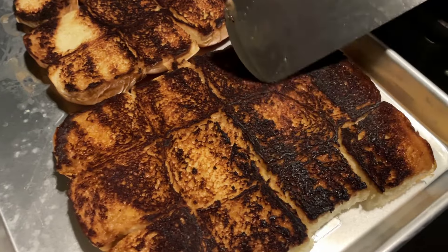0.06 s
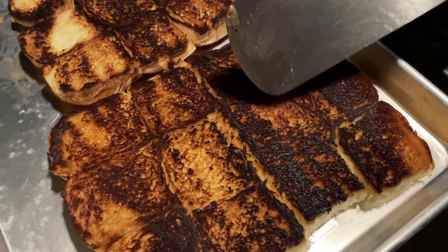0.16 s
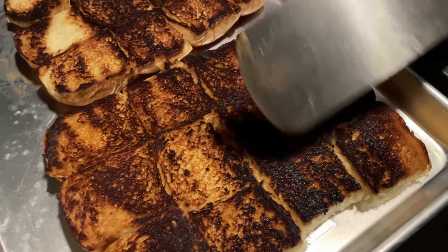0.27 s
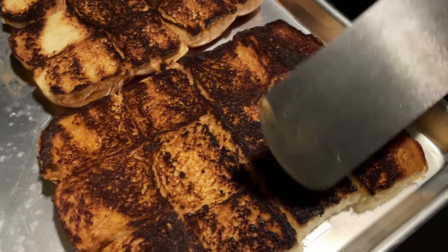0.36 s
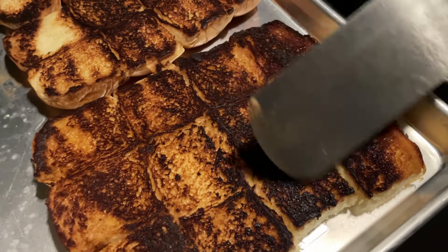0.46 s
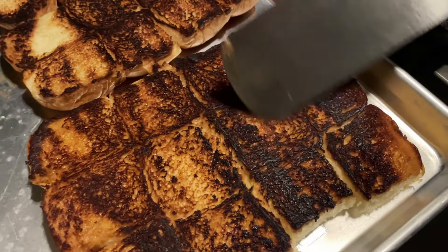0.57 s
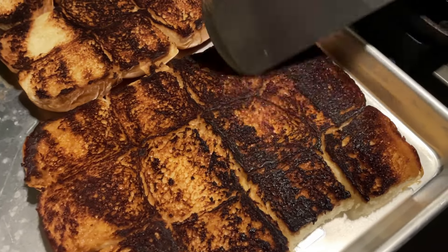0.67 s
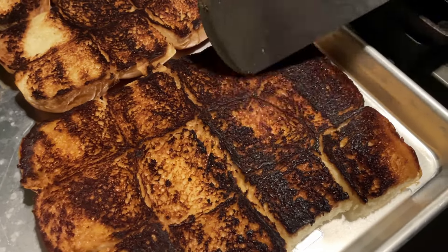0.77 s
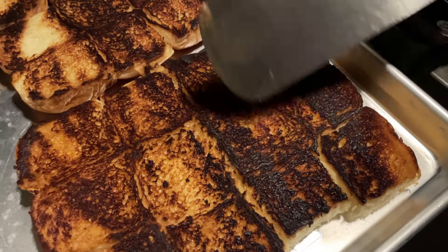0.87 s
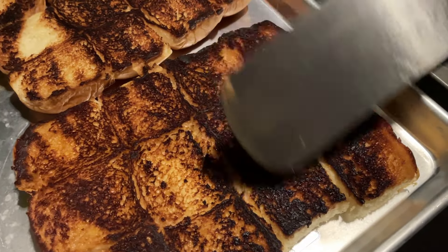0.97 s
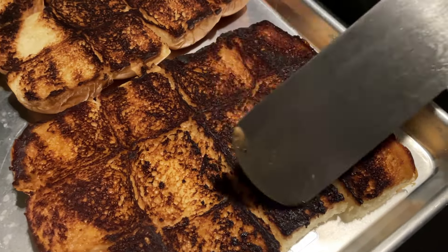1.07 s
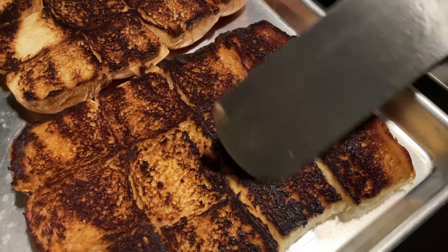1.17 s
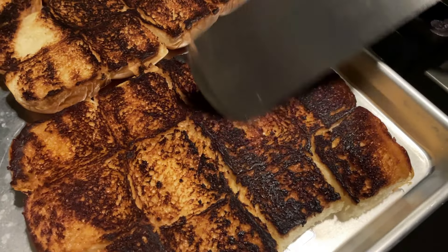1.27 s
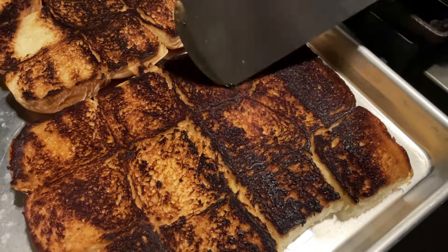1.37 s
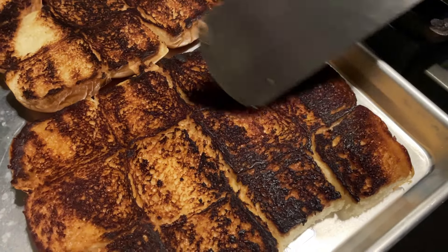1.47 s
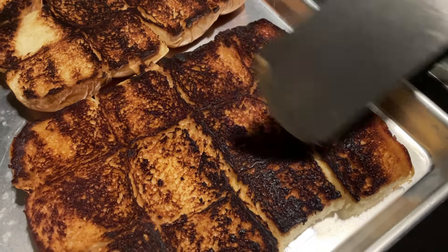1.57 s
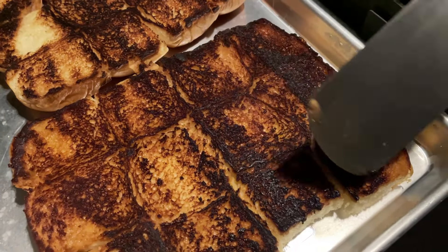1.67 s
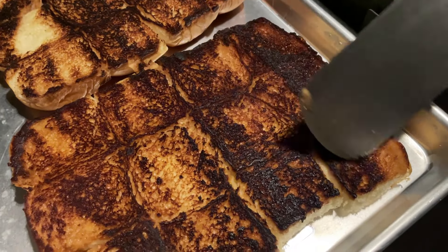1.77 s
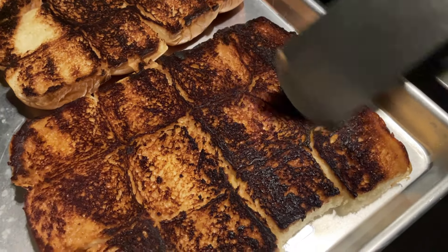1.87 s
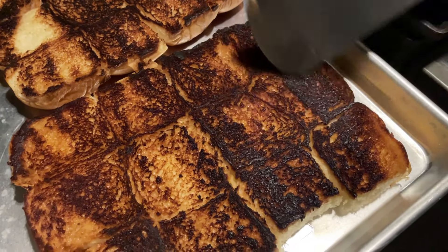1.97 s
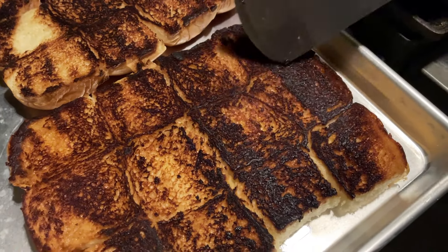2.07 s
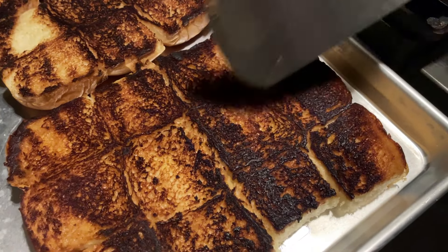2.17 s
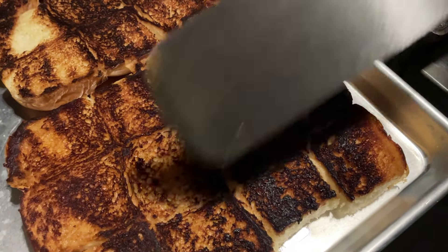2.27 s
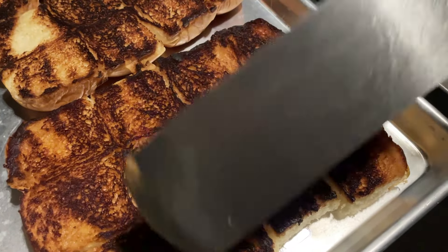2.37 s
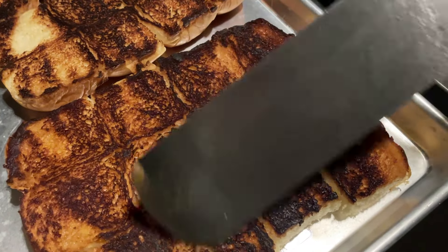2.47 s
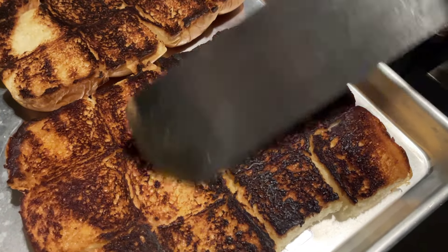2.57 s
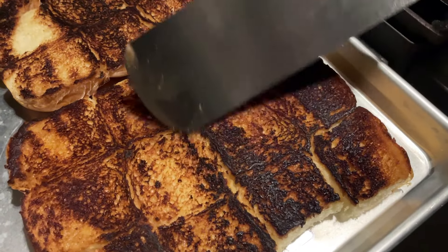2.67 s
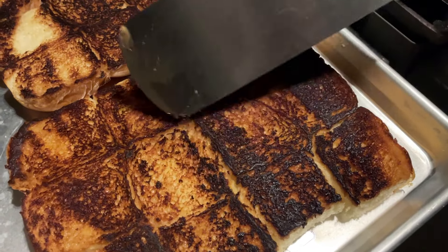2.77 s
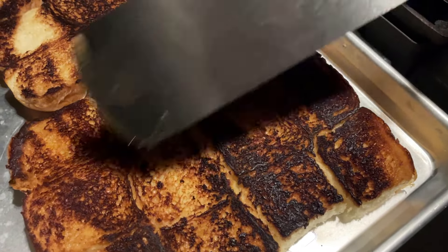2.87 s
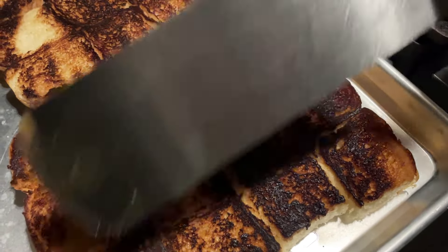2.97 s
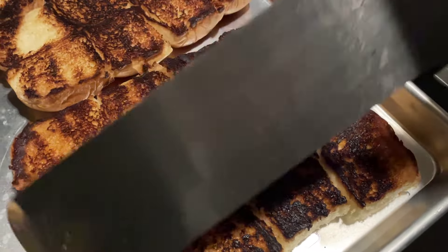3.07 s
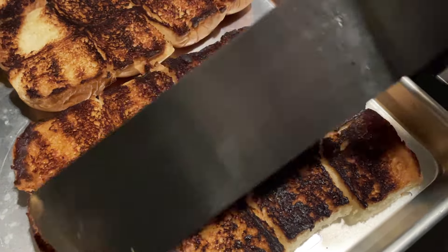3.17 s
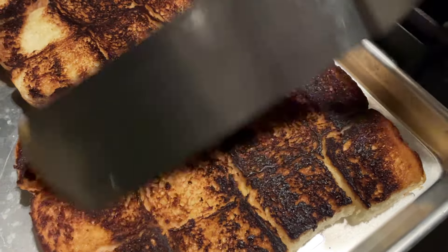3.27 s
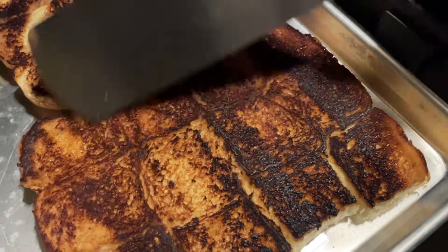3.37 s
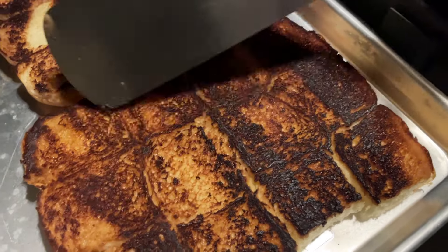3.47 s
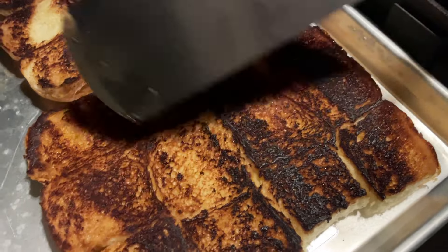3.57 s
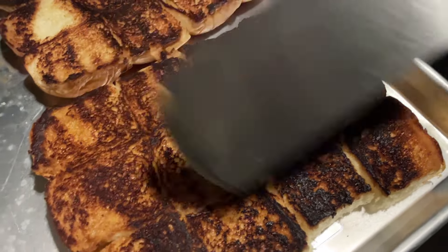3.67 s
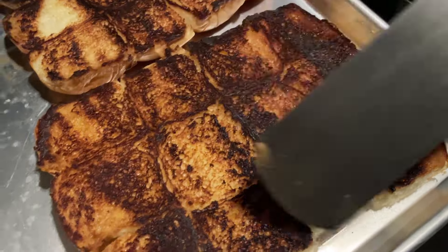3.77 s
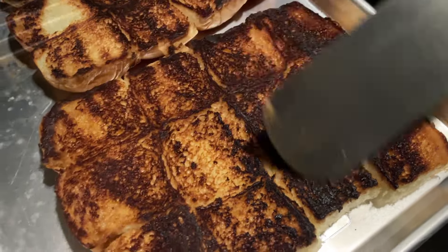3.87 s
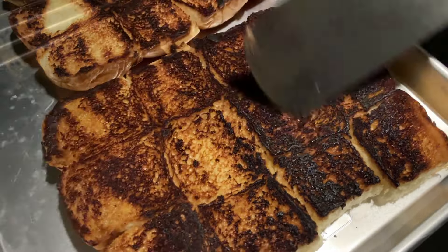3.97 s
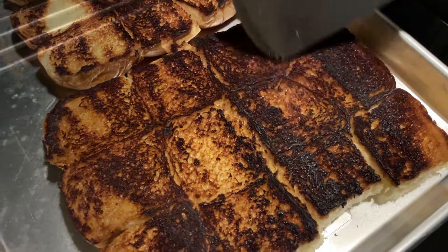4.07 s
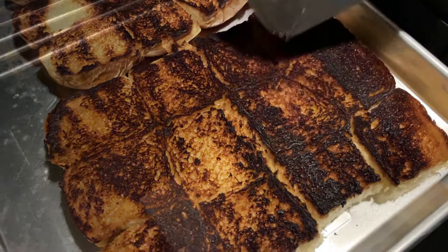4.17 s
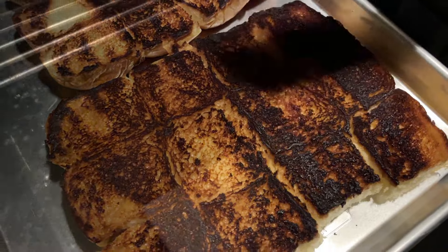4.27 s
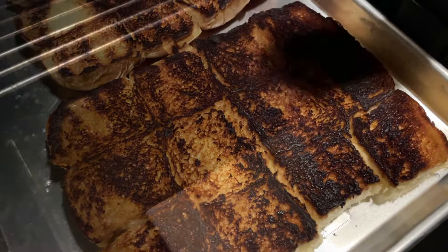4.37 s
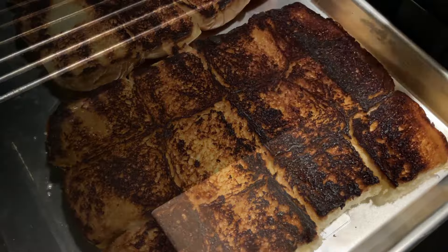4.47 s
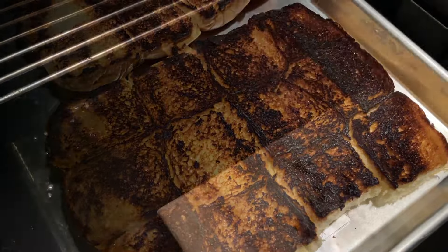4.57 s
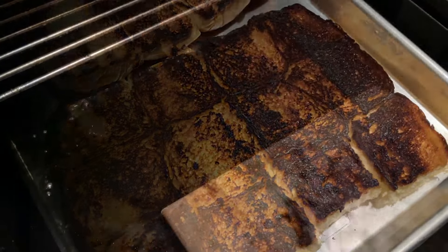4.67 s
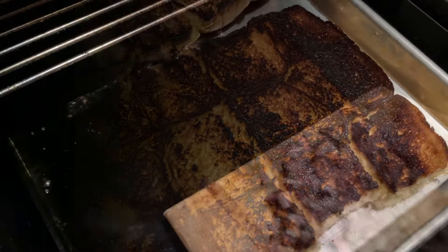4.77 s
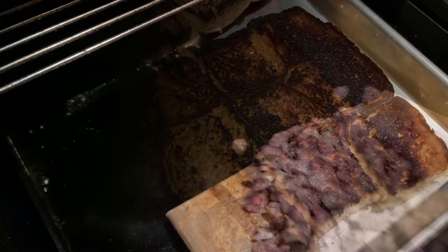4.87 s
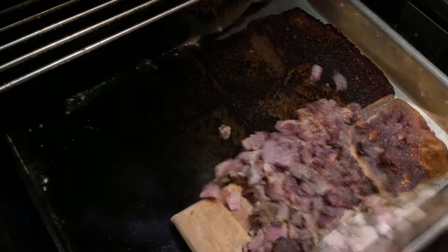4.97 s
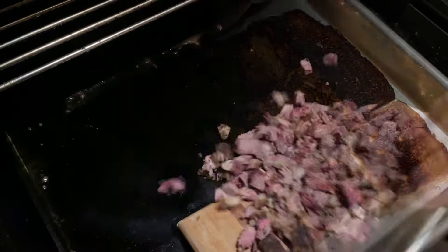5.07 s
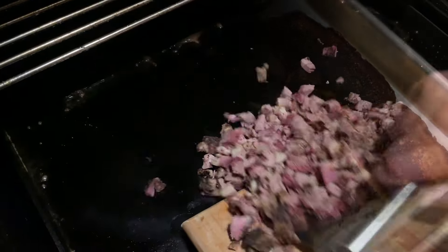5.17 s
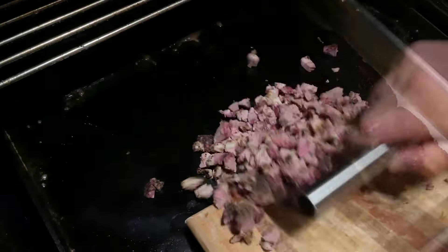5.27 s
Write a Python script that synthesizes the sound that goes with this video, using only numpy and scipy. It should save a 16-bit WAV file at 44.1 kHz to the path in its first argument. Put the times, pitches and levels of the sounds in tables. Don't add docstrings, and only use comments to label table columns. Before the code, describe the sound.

Crisp scrapes of a metal blade across burnt crust, one after another, then a brief gritty push on a wooden board.

```python
import sys
import numpy as np
from scipy import signal
from scipy.fft import rfft, irfft
from scipy.io import wavfile

SR = 44100
rng = np.random.default_rng(int(sys.argv[2]) if len(sys.argv) > 2 else 0)


def gain_from_db(level_db):
    decades = np.asarray(level_db, float) / 20
    return 10 ** decades


def digitize_waveform(pressure):
    field = np.atleast_2d(pressure).T
    bounded = np.clip(field, -1, 1)
    quanta = np.round(bounded * 32767).astype(np.int16)
    wavfile.write(sys.argv[1], SR, quanta)


N = 234021
T = np.arange(N) / SR

# (frequency [Hz], density [dB per Hz])
HISS = [(600, -27), (1500, -19.5), (4500, -14.5), (7000, -13.5), (9500, -6), (12000, -12.5), (13500, -4.5),
        (15500, -16), (16000, -41)]


def evened(x):
    return x / np.sqrt(np.mean(x ** 2) + 1e-20)


def read(points, hz):
    f, value = np.transpose(points)
    return np.interp(np.log(hz + 1), np.log(f + 1), value)


def coloured(x, points):
    hz = np.fft.rfftfreq(1023, 1 / SR)
    slope_db = read(points, hz) - 40 * (hz < points[0][0] / 2)
    taps = np.fft.fftshift(np.fft.irfft(gain_from_db(slope_db), 1023)) * np.hanning(1023)
    return signal.oaconvolve(x, taps[None] / np.linalg.norm(taps), "same", axes=1)


def gain_curve(rows, column):
    rows = np.array(rows)
    return np.interp(T, rows[:, 0], rows[:, column], -200, -200)


def grains(per_s, spread_db):
    size_db = spread_db * np.minimum(rng.exponential(1, (2, N)), 3.5)
    size = gain_from_db(size_db) * rng.standard_normal((2, N))
    return evened(size * (rng.random((2, N)) < per_s / SR))


def wander(per_s):
    knots = rng.standard_normal(400)
    return np.interp(T * per_s, np.arange(400), knots)


def ring(drive, hz, width):
    r = np.exp(-np.pi * width / SR)
    return 2 * signal.lfilter([1 - r], [1, -r * np.exp(2j * np.pi * hz / SR)], drive)


def clicks(events):
    train = np.zeros(N)
    for s, db, *_ in events:
        train[round(s * SR)] = gain_from_db(db)
    return train


def duct_flap():
    # (time [s], peak [dB], pitch [Hz])
    flaps = [(0.108, -36, 223), (0.394, -39.5, 201.4), (0.57, -35.5, 174), (0.679, -41.5, 219),
             (0.767, -36.5, 207.7), (0.84, -36.5, 201), (1.03, -41.5, 177.3), (1.122, -35.5, 197),
             (1.226, -42.5, 229), (1.378, -39, 169.5), (1.5, -44, 143.7), (1.659, -35, 205),
             (1.777, -38, 175.5), (1.99, -39, 141.7), (2.137, -38.5, 204), (2.183, -34, 196),
             (2.585, -37, 219), (2.721, -36, 203), (2.758, -40.5, 209), (2.881, -37, 182.5),
             (3.063, -36, 180), (3.246, -37.5, 190), (3.352, -40, 250), (3.483, -39.5, 162),
             (3.584, -39.5, 211.6), (3.696, -41.5, 202), (3.799, -37.5, 235.6), (4.39, -44.5, 159),
             (4.583, -48, 231.5), (4.934, -41.5, 218.5)]
    thuds = np.zeros(N + 2000)
    t = np.arange(2000) / SR
    for s, db, hz in flaps:
        bell = np.exp(-((t - 0.010) * hz / 0.84) ** 2)
        tone = np.cos(2 * np.pi * (hz * t + rng.random()))
        thuds[round(s * SR):][:2000] += gain_from_db(db + 2) * bell * tone
    return thuds[:N]


def extractor():
    # (frequency [Hz], density [dB per Hz])
    air_spectrum = [(25, -54.5), (45, 3.5), (100, 2.5), (220, -2), (330, -12.5), (600, -19), (1200, -26.5),
                    (2500, -36), (5000, -43.5), (9000, -45), (13850, -50.5), (14150, -36), (14500, -44.5),
                    (16000, -63)]
    rumble_db, fade_s, fade_db_s, faded_db = -47, 3.97, 6.5, -54
    hz = np.fft.rfftfreq(N, 1 / SR)
    noise = rfft(rng.standard_normal((2, N)), axis=1)
    air = evened(irfft(noise * gain_from_db(read(air_spectrum, hz)), N, axis=1))
    lumps = signal.sosfiltfilt(signal.butter(2, 300, fs=SR, output="sos"), air)
    air = air + (gain_from_db(2.0 * wander(14)) - 1) * lumps
    pitches = np.geomspace(420, 1300, 9) * rng.uniform(0.94, 1.05, 9)
    clatter = sum(ring(grains(30, 1.5), pitch, 18).real for pitch in pitches)
    level_db = np.maximum(rumble_db - fade_db_s * np.maximum(T - fade_s, 0), faded_db)
    return gain_from_db(level_db) * (air + gain_from_db(-20.5) * evened(clatter))


def oven():
    # (time [s], pitch [Hz], level [dB])
    hum = [
        (3.4, 47.6, -62),
        (3.75, 48.16, -54.5),
        (3.83, 47.6, -48.5),
        (4.052, 46.65, -41),
        (4.414, 49.7, -41),
        (4.588, 48.3, -48),
        (4.912, 52.75, -48),
        (5.08, 53.9, -62),
        (5.307, 54.5, -58),
    ]
    s, hz, _ = np.transpose(hum)
    turn = 2 * np.pi * np.cumsum(np.interp(T, s, hz)) / SR
    return gain_from_db(gain_curve(hum, 2) + 5.5) * (np.sin(turn) + 0.019 * np.sin(2 * turn))


def scraper():
    # (time [s], level [dB])
    push = [
        (4.6, -100),
        (4.746, -85.5),
        (4.858, -77),
        (4.902, -84),
        (4.93, -74),
        (5.022, -65),
        (5.138, -52),
        (5.25, -49),
        (5.307, -49.5),
    ]
    # (frequency [Hz], width [Hz], level [dB])
    board_modes = [(705, 51, -1), (1470, 39, 13.5), (1800, 100, -2), (2120, 190, 3), (2380, 80, 7),
                   (2620, 60, 7.5), (3230, 96, 6.5), (3920, 27, -22)]
    board_db, top_db, sag, lift_s = 7.5, -56.5, 0.55, 5.27
    rub = grains(17000, 3.1)
    speed_db = gain_curve(push, 1)
    drive_db = speed_db + board_db
    press_db = np.minimum(drive_db, top_db - sag * (drive_db - top_db))
    press_db = press_db - 20 * (T > lift_s)
    board = np.zeros((2, N))
    for hz, width, db in board_modes:
        board += gain_from_db(db) * ring(rub * gain_from_db(press_db + 2.0 * wander(25)), hz, width).real
    return gain_from_db(3.5) * coloured(rub, HISS) * gain_from_db(speed_db) + gain_from_db(14.5) * board


def far_whines():
    # (time [s], length [s], frequency [Hz], level [dB])
    whine_rows = [
        (0.286, .2, 1790, -72),
        (0.765, 0.18, 416, -65),
        (0.83, 0.11, 881, -62.5),
        (2.142, 0.18, 538, -66),
        (4.695, 0.22, 1013, -68),
        (4.913, 0.12, 705, -61.5),
    ]
    out = np.zeros((2, N))
    for s, length, hz, db in whine_rows:
        bell = np.exp(-((T - s - length / 2) / length * 2) ** 4)
        out += gain_from_db(db) * bell * evened(ring(rng.standard_normal((2, N)), hz, 28).real)
    return out


def hand_taps():
    # (time [s], peak [dB], frequency [Hz], width [Hz])
    tap_rows = [
        (1.049, -56, 575, 250),
        (1.086, -45, 1000, 251),
        (1.655, -52, 1000, 250),
        (2.179, -65, 537, 250),
        (3.8, -52, 610, 250),
        (4.388, -61, 950, 250),
        (4.779, -60.5, 1350, 250),
        (4.934, -59, 1470, 250),
    ]
    out = np.zeros(N)
    for row in tap_rows:
        hz, width = row[2:]
        once = ring(clicks([row]), hz, width).real
        out += ring(once, hz, width).real * SR / width
    return gain_from_db(-8.5) * out


def crumbs_and_brush():
    # (time [s], peak [dB])
    tick_rows = [
        (0.2653, -40),
        (2.9238, -44.5),
        (4.557, -54.5),
        (4.9214, -49),
        (5.001, -63),
    ]
    brush_s, brush_db, rise_s, fall_db_s = 0.2705, -57, 0.018, 215.5
    fizz = rng.standard_normal((2, 400)) * gain_from_db(-60 * np.arange(400) / SR / 0.0086)
    ticks = signal.oaconvolve(clicks(tick_rows)[None], fizz, axes=1)[:, :N]
    brush = gain_from_db(brush_db - fall_db_s * abs(T - brush_s))
    brush *= np.clip(1 + (T - brush_s) / rise_s, 0, 1)
    return coloured(gain_from_db(-8.0) * ticks + gain_from_db(6) * grains(12000, 0.67) * brush, HISS)


def tray(x):
    out = 0.2 * x
    t = np.arange(5000)[:, None] / SR
    for k in range(3):
        pitch = rng.uniform(1100, 16000, 110)
        phase = 2 * np.pi * rng.random((2, 1, 110))
        body = (np.cos(2 * np.pi * pitch * t + phase) * gain_from_db(-60 * t / 0.08)).sum(2)
        share = np.sqrt(2 / 3) * np.cos(12 * T + k * np.pi / 3)
        out = out + 0.7 * signal.oaconvolve(x * share, body / np.linalg.norm(body[0]), axes=1)[:, :N]
    return out


def crust_crackle(snaps, push, landing):
    # (frequency [Hz], density [dB per Hz])
    crust = [(1100, -25), (1450, 2.5), (1900, -11), (2350, -6), (2750, -11), (3800, -3.5), (4700, -12),
             (5150, -6), (5600, -27), (7700, -2.5), (10800, -12), (13200, -9), (14600, -15), (15700, -32.5)]
    return coloured(tray(snaps * push + landing), crust)


def crumb_crunch(push, since):
    # (frequency [Hz], density [dB per Hz])
    crunch = [(250, -6.5), (450, -12), (800, -1), (1200, -9.5), (1600, -20.5)]
    dig_s, dig_db = 0.062, -10
    push = push * gain_from_db(dig_db * np.exp(-np.maximum(since, 0) / dig_s))
    return gain_from_db(4) * coloured(grains(2500, 2.66) * push * gain_from_db(4.9 * wander(25)), crunch)


def blade_favour(stroke, since, over_firm_db):
    # (2nd, 4th, 5th, 6th and 11th mode [dB])
    grip = [(8, -25.5, -1, -10, 8), (3.5, -2.5, 0.5, -3, 6), (1.5, 2, 2, -6, -0.5),
            (-0.8, -0.5, 1.7, -0.1, 4), (1.5, 1, 1, -4.5, 2.2), (-1.2, -30.5, -5.5, -4, 2.5),
            (4.5, -7.5, -1.5, 0, 6.5)]
    slide_rate = [1, 22, 35.5, 1, -39, 11.5, 64]
    favour_db = dict(zip((1, 3, 4, 5, 10), np.array(grip)[stroke].T))
    slide_db = np.array(slide_rate)[stroke] * (since - 0.13)
    favour_db[3] = favour_db[3] - slide_db
    favour_db[5] = favour_db[5] + slide_db
    favour_db[0] = 0.3 * np.minimum(over_firm_db, 0)
    return favour_db


def blade_ring(snaps, low, middle, top, landing, favour_db):
    mode_hz = [1402, 1620, 2284, 3695, 3935, 4405, 5110, 5640, 5952, 6386, 6948, 7422, 7746, 8125, 8539,
               9050, 9480, 9645, 10700, 11703, 11901, 12160, 12742, 12972, 13340, 13726, 14100, 14700,
               15100]
    # (width [Hz], level [dB])
    mode_shape = [(13.9, 10.5), (11.1, 11.5), (60.4, -8.5), (9.62, 4.5), (14.3, 3.5), (7.5, 4.5), (35, -23),
                  (25.2, -9.5), (20.2, 0), (20, -5.5), (16.8, -3.5), (17, -1.5), (21.8, 4), (20.3, -6),
                  (17, 10.5), (50, 0), (14, -21.5), (20, -0.5), (22, -6.5), (18, -14.5), (25.2, 1),
                  (20, -7.5), (17.94, -4), (22, 2), (50, -11), (24, -17), (29.8, -6.5), (30, -12),
                  (30, -10.5)]
    opening = clicks([(0.0022, -12)])
    long_ring = gain_from_db(9) * ring(snaps[1] * low, 1319, 2.4)
    blade = np.array([long_ring.real, long_ring.imag])
    for k, (hz, (width, db)) in enumerate(zip(mode_hz, mode_shape)):
        if hz < 2000:
            push, group_db = low, 13
        elif hz < 9000:
            push, group_db = middle, 17
        else:
            push, group_db = top, 17
        favour = favour_db.get(k, 0)
        shape_db = favour + (1.8 if k in favour_db else 4.5) * wander(16)
        stored = opening * gain_from_db(favour - 3 * (hz > 2000))
        drive = snaps[0] * push * gain_from_db(shape_db) + landing + stored
        tone = gain_from_db(db + group_db) * ring(drive, hz, width)
        blade += [tone.real, rng.choice([-1, 1]) * tone.imag]
    return blade


def spatula():
    # (time [s], pressure [dB])
    strokes = [
        [(0.0, -30.5), (0.012, -34.5), (0.056, -49.5), (0.095, -60), (0.112, -53.5), (0.126, -57), (0.17, -72)],
        [(0.538, -69), (0.548, -34.5), (0.572, -29.5), (0.6, -31), (0.635, -29), (0.642, -41), (0.7, -53.5),
         (0.79, -79)],
        [(1.135, -72.5), (1.157, -44.5), (1.22, -39), (1.275, -25), (1.331, -39.5), (1.361, -39), (1.385, -55),
         (1.45, -74)],
        [(1.772, -109), (1.78, -35), (1.804, -43), (1.894, -37.5), (1.93, -39.5), (2.032, -33.5), (2.06, -60.5),
         (2.12, -72)],
        [(2.498, -77), (2.508, -35), (2.52, -29.5), (2.59, -33), (2.603, -20.5), (2.655, -31), (2.724, -37.5),
         (2.8, -99)],
        [(3.163, -87), (3.172, -46), (3.185, -36.5), (3.3, -31.5), (3.365, -26.5), (3.44, -35.5), (3.47, -58.5),
         (3.54, -74)],
        [(3.853, -95.5), (3.861, -45.5), (3.9, -38), (3.92, -37.5), (4.0, -33), (4.055, -44.5), (4.09, -52),
         (4.15, -85)],
    ]
    # (landing time [s], landing peak [dB], low blade pair [dB],
    # middle blade modes [dB], bread crunch [dB])
    landings = [
        (0.11, -42, -2.5, 1.3, -11),
        (0.5541, -24.5, -2, -4, -13),
        (1.1453, -36, 0.5, -1, -9.5),
        (1.7803, -44.5, 4, 0, -12.5),
        (2.5077, -12.5, 0.5, -1, -14),
        (3.1749, -13, -3, 0, -12),
        (3.8696, -14, 2, 2, -13.5),
    ]
    firm_db = -37
    follow = np.array([[0.91], [0.84], [0.64]])
    pressure_db = np.max([gain_curve(rows, 1) for rows in strokes], axis=0)
    stroke = np.searchsorted([rows[0][0] for rows in strokes], T, "right") - 1
    by_stroke = np.array(landings)[stroke]
    since = np.minimum(T - by_stroke[:, 0], 0.3)
    over_firm_db = pressure_db - firm_db
    top = gain_from_db(pressure_db)
    low, middle, crumb = gain_from_db(firm_db + follow * over_firm_db + by_stroke[:, 2:].T)
    snaps = grains(9000, 3.3) * gain_from_db(1.47 * wander(60))
    landing = gain_from_db(2) * clicks(landings)
    favour_db = blade_favour(stroke, since, over_firm_db)
    blade = blade_ring(snaps, low, middle, top, landing, favour_db)
    crackle = crust_crackle(snaps, np.sqrt(top * middle), landing)
    return blade + crackle + crumb_crunch(crumb, since)


def kitchen(x):
    taps = rng.choice([-1., 1.], (2, 12000)) * (rng.random((2, 12000)) < 0.05)
    taps *= gain_from_db(-60 * np.arange(12000) / SR / 0.48)
    return signal.oaconvolve(x, taps / np.linalg.norm(taps[0]), axes=1)[:, :N]


def scene():
    touches = crumbs_and_brush() + hand_taps() + far_whines()
    near = spatula() + touches + scraper()
    return near + gain_from_db(-24.0) * kitchen(near) + extractor() + duct_flap() + oven()


def top_cut(x):
    return signal.sosfilt(signal.butter(12, 16520, fs=SR, output="sos"), x)


def record(dry):
    # (frequency [Hz], left lead [radians])
    lead = [(100, 0), (700, .4), (1700, -.2), (2800, .7), (5200, .5), (5900, -1.7), (6800, -1.3),
            (7600, -2.3), (8350, -3.04), (8750, -3.24), (10500, -4.45), (13400, -6.28), (16000, -6.4)]
    # (frequency [Hz], likeness [0-1])
    likeness = [(60, .97), (300, .85), (700, .45), (1500, .88), (3000, .65), (6500, .55), (7600, .85),
                (8350, .978), (8750, .978), (9800, .82), (12500, .82), (13400, .998), (15000, .995),
                (16000, .85)]
    # (frequency [Hz], left minus right [dB])
    tilt = [(50, 3.5), (250, 2.5), (700, 7), (1500, 1), (3000, 6), (7000, 4), (8100, 0), (16000, 0)]
    hz = np.fft.rfftfreq(N, 1 / SR)
    left, other = rfft(dry, axis=1) / (1 + (hz / 15780) ** 260)
    alike = np.clip(read(likeness, hz), 0, 1)
    unlike = np.sqrt(1 - alike ** 2)
    right = (alike * left + unlike * other) / np.where(hz < 70, alike + unlike, 1)
    right *= np.exp(-1j * read(lead, hz)) / gain_from_db(read(tilt, hz))
    return top_cut(irfft(np.array([left, right]), N, axis=1))


dry = scene()
out = record(dry)
digitize_waveform(out)
```